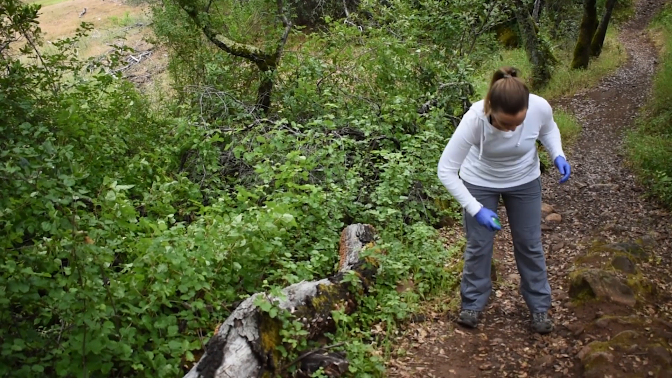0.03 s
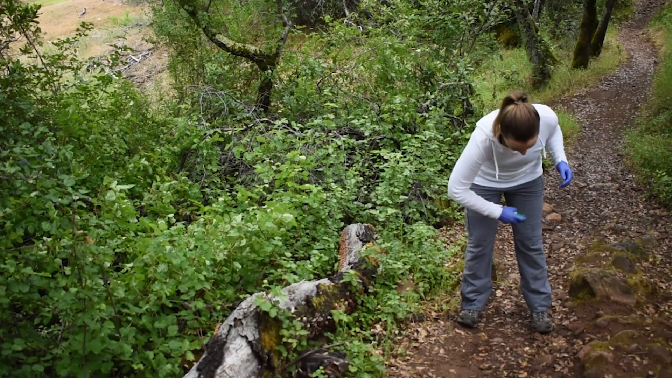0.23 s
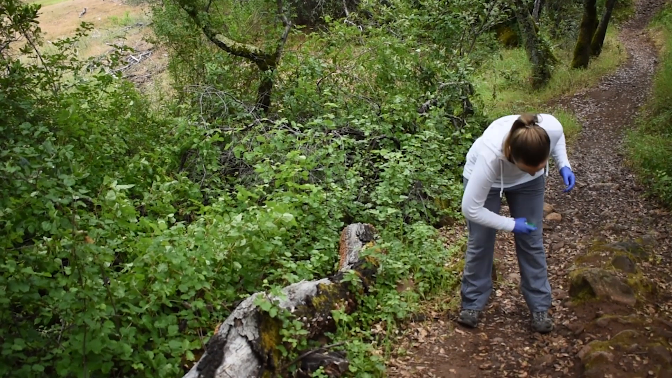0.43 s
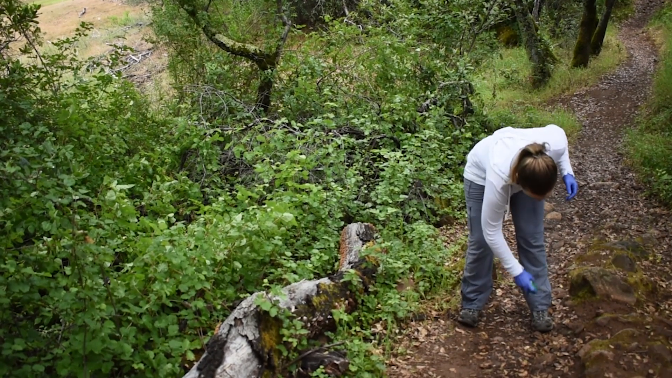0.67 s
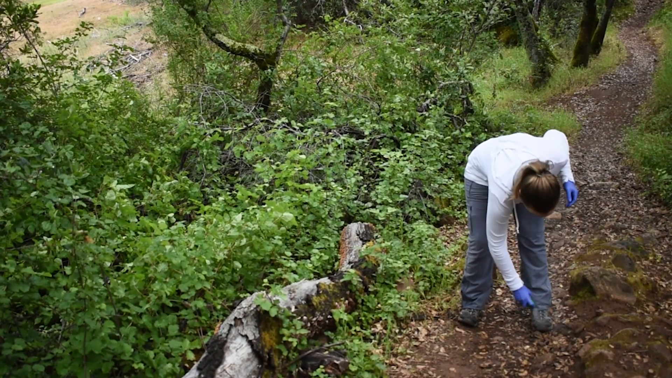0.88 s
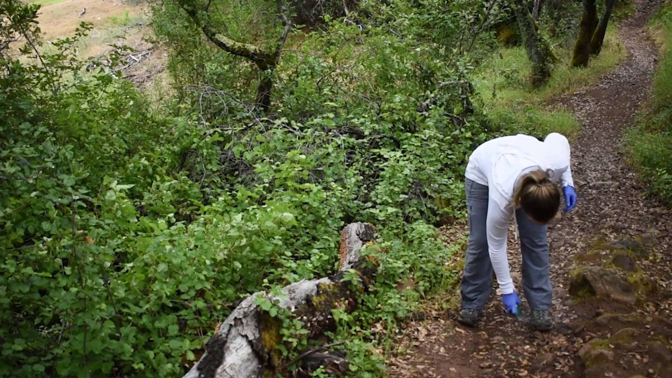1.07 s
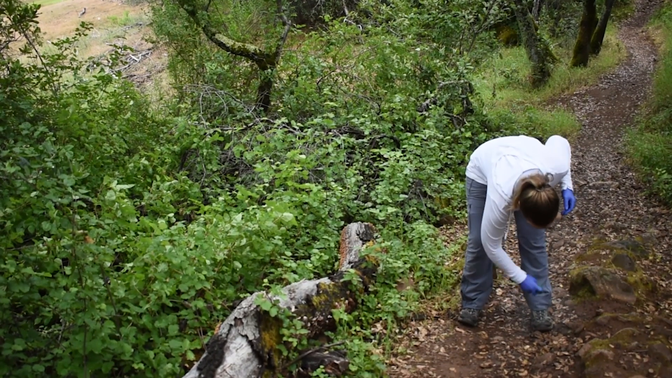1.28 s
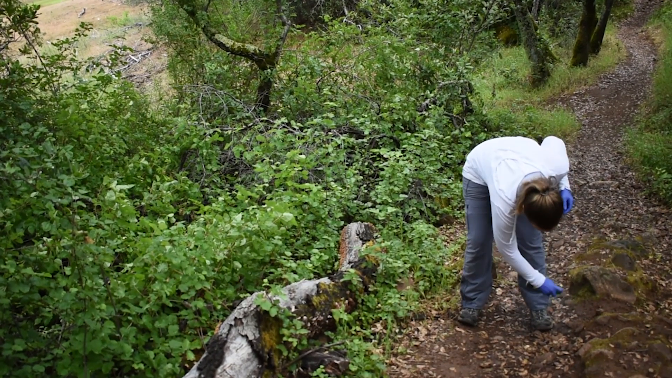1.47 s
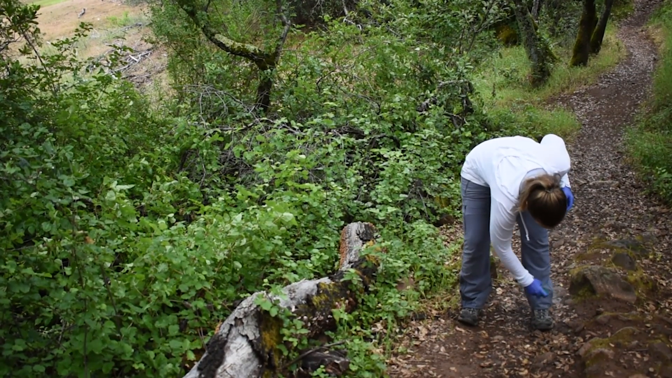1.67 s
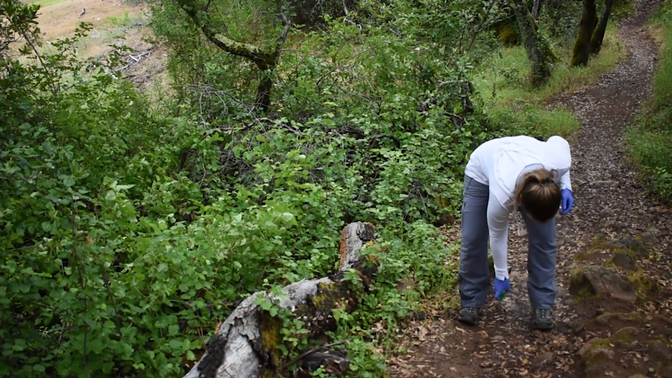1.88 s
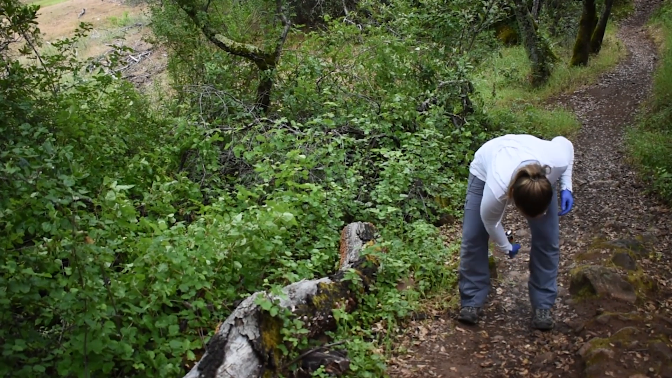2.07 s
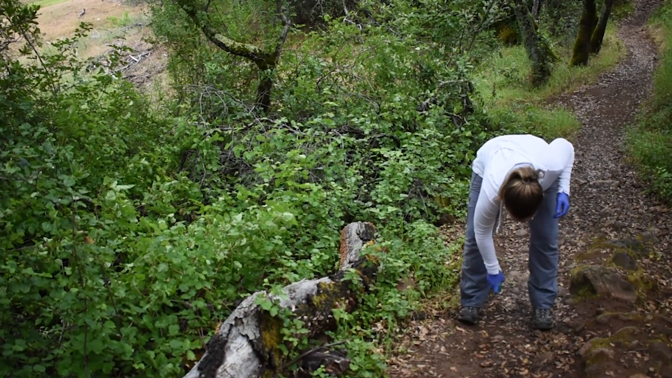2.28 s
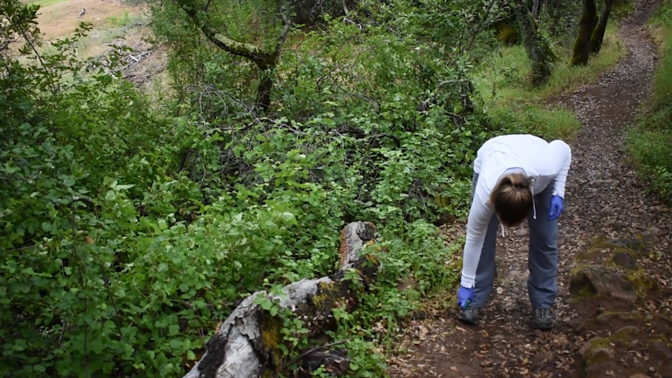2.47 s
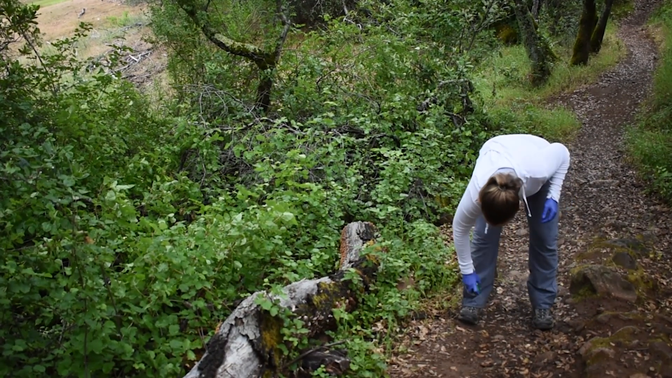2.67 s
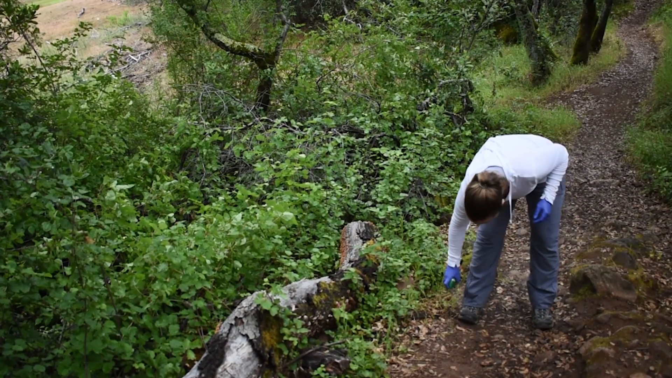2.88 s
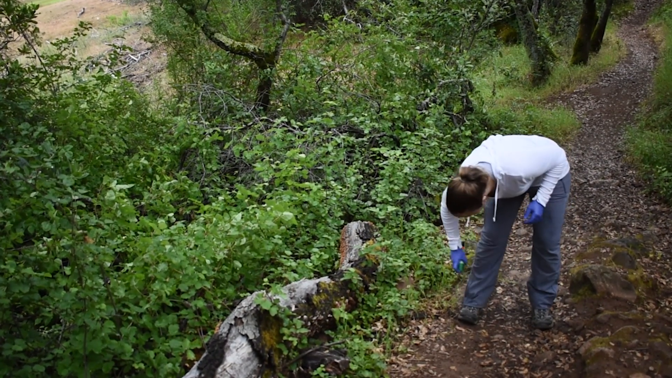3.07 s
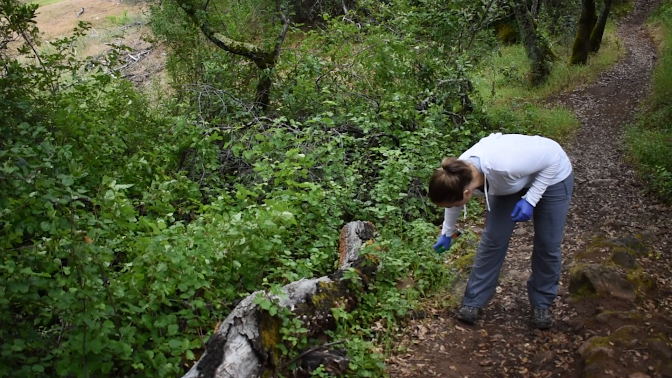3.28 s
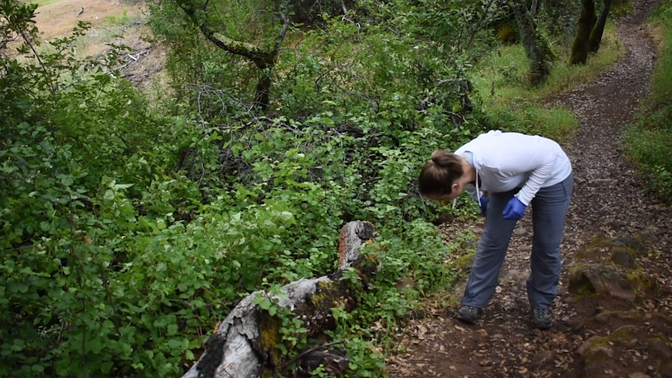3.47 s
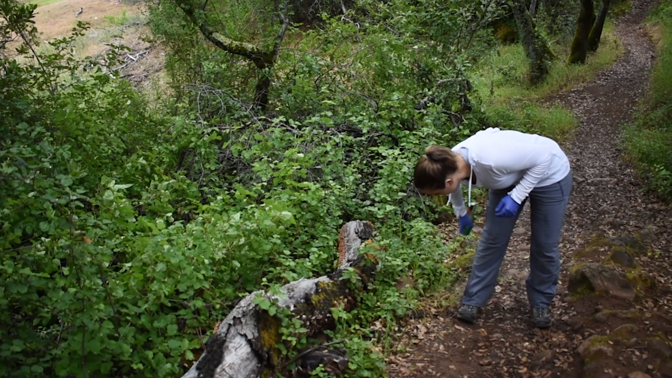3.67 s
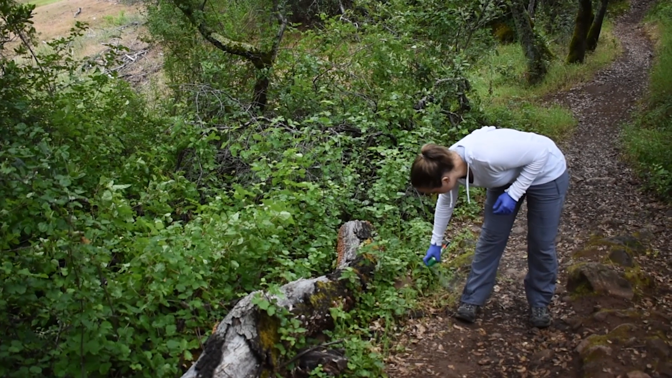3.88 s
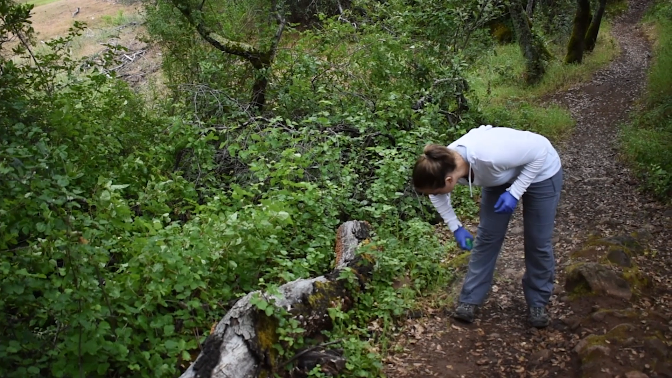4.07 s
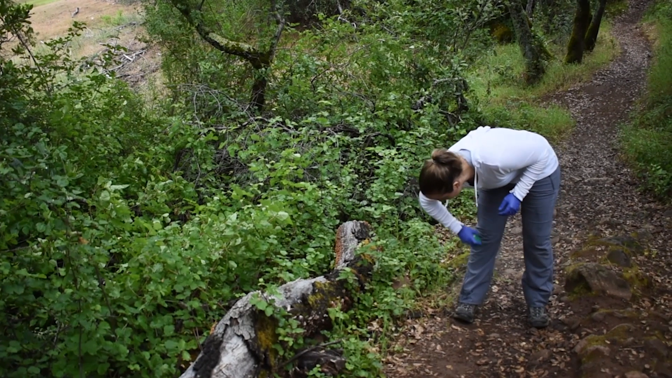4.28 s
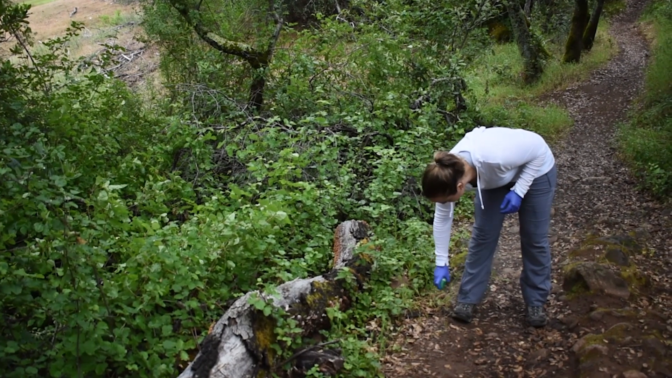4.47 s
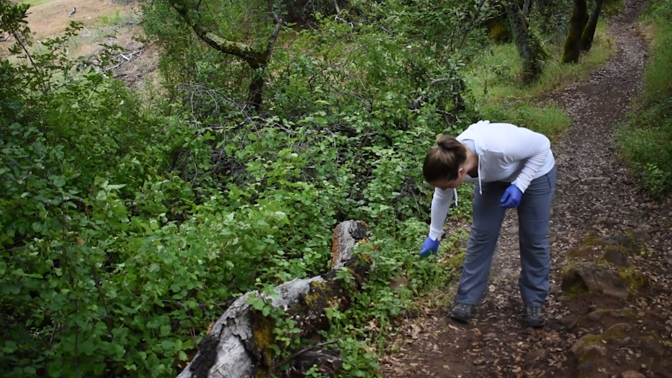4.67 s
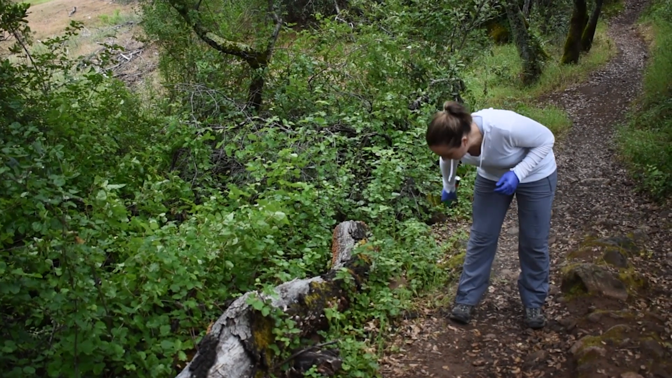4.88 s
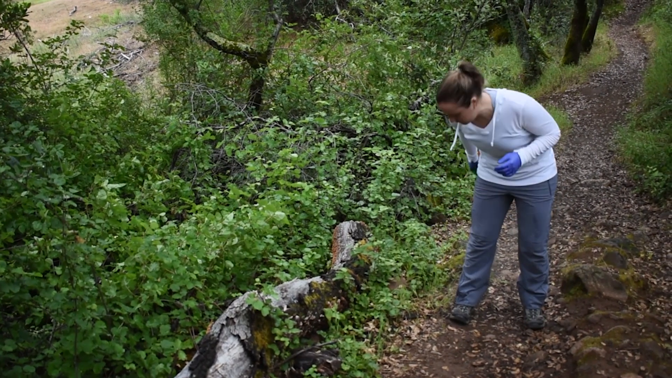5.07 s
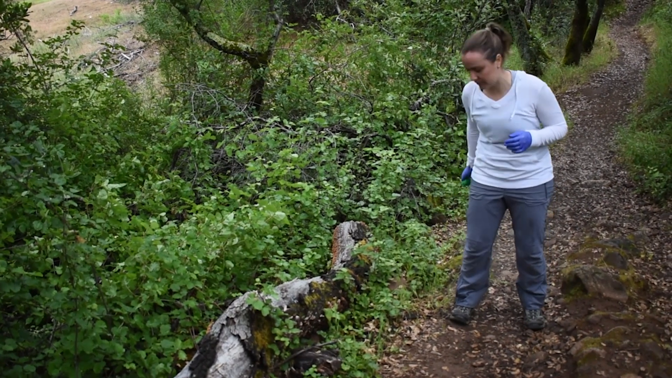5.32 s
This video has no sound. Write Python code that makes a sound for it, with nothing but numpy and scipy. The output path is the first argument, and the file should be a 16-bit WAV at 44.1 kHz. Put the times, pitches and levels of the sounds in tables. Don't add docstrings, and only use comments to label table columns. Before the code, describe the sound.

A quiet wooded trail, with soft far wind and a faint low drone. Small plastic cap ticks click close by at about 0.1 s, among faint bird chips and a short, thin whistle near 0.4 s. From 0.46 to 2.33 s an aerosol sprays: a dense, bright, uneven hiss, fine mist splashing on cloth and leaves, and a hollow, breathy tone around 1300 Hz swelling and fading. A brief gap holds a soft knock and bird chips. The second spray runs from 2.6 to 4.74 s, with lighter mist and a wandering hiss, a low knock at 2.85 s. Chips grow clearer around 4 s, and a steady high whistle holds from 4.4 to 5.4 s. At 4.83 s a foot knocks and crushes dry leaves and grit, settling again at 5.1 s. A rapid high warble falls at 5.15 s and a last chip follows. The spray is near and dry; the birds are distant and lightly reverberant, in stereo.

```python
import sys
import numpy as np
from scipy import signal
from scipy.io import wavfile
from scipy.ndimage import uniform_filter1d, map_coordinates

SR = 44100
rng = np.random.default_rng(int(sys.argv[2]) if len(sys.argv) > 2 else 0)


def rack_gain(trim_db):
    fader = np.asarray(trim_db, float)
    return 10 ** (fader / 20)


def output_pcm(signal):
    pcm = np.clip(np.atleast_2d(signal).T, -1, 1) * 32767
    wavfile.write(sys.argv[1], SR, np.round(pcm).astype(np.int16))


N = 235802


def evened(x):
    return x / np.sqrt(np.mean(x ** 2) + 1e-20)


def read(points, hz):
    f, value = np.transpose(points)
    return np.interp(np.log(hz + 1), np.log(f + 1), value)


def add(mix, s, sound):
    part = mix[..., round(s * SR):][..., :sound.shape[-1]]
    part += sound[..., :part.shape[-1]]


def panned(x, db):
    return x * rack_gain(np.array([[db / 2], [-db / 2]]))


def drift(count, span):
    size = max(int(span), 1)
    smooth = uniform_filter1d(rng.standard_normal(count), size)
    return evened(uniform_filter1d(smooth, size))


def noise(shape_db, patchy_db, frames):
    a, b, patches = rng.standard_normal((frames, 257, 3)).T
    patches = evened(uniform_filter1d(uniform_filter1d(patches, 7, 0), 28, 1))
    gain = rack_gain(shape_db(np.fft.rfftfreq(512, 1 / SR)[:, None]))
    gain = gain / np.sqrt((gain ** 2).mean(0))
    spectra = (a + 1j * b) * gain * rack_gain(patchy_db * patches)
    return evened(signal.istft(spectra, nperseg=512, noverlap=384)[1])


def resonate(x, hz, width_hz):
    turn = np.exp(2j * np.pi * np.cumsum(hz) / SR)
    r = np.exp(-np.pi * width_hz / SR)
    return 2 * (turn * signal.lfilter([1 - r], [1, -r], x / turn)).real


def sung(s, hz, db):
    tone = np.sin(2 * np.pi * np.cumsum(hz) / SR)
    return np.sqrt(2) * rack_gain(db) * tone * signal.windows.tukey(len(s), .08)


def traced(rows):
    s, *columns = np.transpose(rows)
    t = np.arange(s[0], s[-1], 1 / SR)
    return [t] + [np.interp(t, s, c) for c in columns]


def bumps(t, rows, shape):
    return np.abs((t - rows[:, :1]) / rows[:, 1:2]) ** shape


def frame_times(t):
    return t[np.minimum(np.arange(len(t) // 128 + 5) * 128, len(t) - 1)]


# frequency_hz, density_db
WIND_SPECTRUM = [(15, -17), (25, -9), (140, -5), (805, -7), (1960, -18.5), (3640, -16.5), (5590, -24),
                 (15600, -29)]
# frequency_hz, likeness_0_to_1
WIND_COHERENCE = [(60, 0.35), (300, 0.75), (700, 0.81), (1500, 0.77), (5000, 0.64), (15000, 0.25)]


def woods():
    frames, hz = N // 512 + 5, np.fft.rfftfreq(2048, 1 / SR)
    a, b, c, d = rng.standard_normal((frames, 1025, 4)).T
    same = np.clip(read(WIND_COHERENCE, hz), 0, 1)[:, None]
    swell_db = .9 * drift(frames, 14)
    mid, side = np.sqrt(1 + same) * (a + 1j * b), np.sqrt(1 - same) * (c + 1j * d)
    spectra = np.array([mid + side, mid - side]) * rack_gain(read(WIND_SPECTRUM, hz)[:, None] + swell_db)
    air = evened(signal.istft(spectra, nperseg=2048, noverlap=1536)[1][:, :N])
    drone = evened(resonate(rng.standard_normal(N), np.full(N, 70), 7))
    return rack_gain(-64) * air + rack_gain(-76) * drone


# frequency_hz, t60_s
TREE_DECAY = [(300, 0.15), (1500, 0.053), (4000, 0.52), (9000, 0.09), (15000, 0.023)]


def trees(x):
    taps = np.zeros((2, SR))
    at = np.arange(60, SR - 20, 20) + rng.integers(0, 20, (2, (SR - 61) // 20))
    np.put_along_axis(taps, at, rng.choice([-1., 1.], at.shape), 1)
    hz, t, z = signal.stft(taps, SR, nperseg=256)
    decay = rack_gain(-60 * t / read(TREE_DECAY, hz)[:, None])
    tail = signal.istft(z * decay, SR, nperseg=256)[1]
    return signal.fftconvolve(x[None], tail / np.linalg.norm(tail[0]), axes=1)[:, :N]


# time_s, pitch_hz, level_db
CHIP_SHAPE = [(0, 5500, -9), (.012, 2900, -2), (.015, 3600, -9), (.019, 4650, -4), (.026, 4420, 0),
              (.043, 3700, -2), (.050, 2400, -14), (.058, 1700, -24)]
# start_s, level_db, perch_index
CHIP_CALLS = [(.030, -71, 1), (.278, -70, 0), (1.24, -68, 1), (1.54, -68, 1), (1.82, -68, 1),
              (2.118, -62, 1), (2.262, -66, 1), (2.342, -63, 1), (2.568, -62, 1), (3.172, -65, 1),
              (3.943, -59.5, 1), (4.163, -59.5, 1), (4.375, -59.5, 1), (4.652, -59.5, 1), (5.196, -57.5, 0)]
# left_right_db, scatter_db, right_delay_samples
PERCHES = [
    (2, -4, 1),
    (3, 3, 4),
]


def chips():
    direct, scattered = np.zeros((2, N)), np.zeros(N)
    t, hz, shape_db = traced(CHIP_SHAPE)
    pitches = 1 + 0.0107 * rng.standard_normal(len(CHIP_CALLS))
    for (s, db, perch), pitch in zip(CHIP_CALLS, pitches):
        pan_db, scatter_db, late = PERCHES[perch]
        call = rack_gain(db) * sung(t, pitch * uniform_filter1d(hz, 60), shape_db)
        left, right = panned(call, pan_db)
        add(direct[0], s, left)
        add(direct[1], s + late / SR, right)
        add(scattered, s, rack_gain(scatter_db) * call)
    return direct, scattered


# top_hz, trough_hz, level_db
WARBLE_SWINGS = [(9700, 7900, -65), (9050, 7350, -64), (8900, 7150, -66.5), (8550, 7200, -68.5),
                 (7750, 7250, -74)]


def warble():
    out, t = np.zeros((2, N)), np.arange(5.141, 5.272, 1 / SR)
    swings = 36.8 * (t - 5.1515)
    top_hz, low_hz, db = (np.interp(swings, range(len(WARBLE_SWINGS)), c) for c in np.transpose(WARBLE_SWINGS))
    height = (np.cos(2 * np.pi * swings) - .12 * np.cos(4 * np.pi * swings) + 1.12) / 2
    db = db + 25 * np.minimum(swings, 0)
    add(out, t[0], panned(sung(t, low_hz + (top_hz - low_hz) * height, db), -1.6))
    return out


def arched_whistle():
    out, length_s = np.zeros((2, N)), .058
    off = np.linspace(-1, 1, round(length_s * SR)) ** 2
    add(out, .378, panned(sung(off, 6700 - 720 * off, -74.5 - 7 * off), -3))
    return out


# start_s, length_s, pitch_hz, level_db, left_right_db
HELD_WHISTLES = [
    (0, .04, 3345, -71.5, 2),
    (4.42, .99, 3432, -66.5, 5),
    (4.6, .6, 2921, -76.5, 3),
]


def held_whistles():
    out = np.zeros((2, N))
    for s, length, hz, db, pan_db in HELD_WHISTLES:
        t = np.arange(0, length, 1 / SR)
        hz = hz - 55 * np.maximum(t - .42, 0) + 4 * drift(len(t), 900)
        db = db - 8 * np.maximum(1 - t / length / .3, 0) + .9 * drift(len(t), 300)
        add(out, s, panned(sung(t, hz, db), pan_db))
    return out


# start_s, level_db
TREADS = [
    (4.828, -60),
    (4.857, -55.5),
    (5.09, -57.5),
]
# frequency_hz, density_db
LITTER_SPECTRUM = [(120, -38), (250, -10.5), (550, -4.5), (1100, -13), (2300, -23.5), (3000, -19),
                   (5000, -32), (15000, -36)]


def shuffle():
    t = np.arange(4.81, 5.345, 1 / SR)
    s, peak_db = np.transpose(TREADS)[..., None]
    rise_db_per_s, fall_db_per_s = 500, 18
    db = (peak_db + np.minimum(rise_db_per_s * (t - s), fall_db_per_s * (s - t))).max(0)
    crush = noise(lambda hz: read(LITTER_SPECTRUM, hz), 1.4, len(t) // 128 + 5)[:len(t)]
    return t[0], rack_gain(db - 3.0) * evened(crush * rack_gain(1.6 * drift(len(t), 120)))


# start_s, peak_db, body_hz, edge_relative_db, edge_hz
CAP_TICKS = [(.0733, -45, 910, 1, 5000), (.0734, -52, 2500, -1, 3300), (.0975, -63, 6000, 4, 5500),
             (.1016, -45, 2400, 6, 4600), (.1022, -48, 950, -5, 10500), (.1300, -49, 2800, 11, 3900),
             (.1301, -57, 10300, 6, 8000), (2.446, -57, 160, -8, 3000), (2.8547, -44, 450, 5, 850),
             (4.8265, -46, 780, -6, 1200), (4.8502, -42, 270, 2, 900)]


def ticks():
    out, t = np.zeros(N), np.arange(4000) / SR
    rise = 1 - np.exp(-t / .00015)
    for s, db, hz, edge_db, edge_hz in CAP_TICKS:
        decay_db = -60 * t / .011 * np.sqrt(hz / 1000)
        body = rack_gain(decay_db) * np.sin(2 * np.pi * hz * t)
        edge = rack_gain(edge_db - 60 * t * edge_hz / 12) * np.sin(2 * np.pi * edge_hz * t)
        sign = 1 if hz < 500 else -1
        add(out, s, sign * rack_gain(db) * (1.3 * body + edge) * rise)
    return out


# time_s, splash_db, brightness_db_per_octave, fineness_db
MIST = [
    [(.49, -49, 3, -10), (.72, -49, 0.5, -7), (1.0, -49.5, 2.5, -12), (1.17, -56, -5.5, 0),
     (1.47, -51.5, 5.5, -14), (1.63, -56.5, 12, -19), (1.72, -51.5, -3, -2), (2.02, -52.5, 3.5, -7),
     (2.25, -50.5, 0, -2.5)],
    [(2.62, -54, 3.5, -8), (2.74, -55.5, -0.5, 0), (3.0, -59, -5.5, 0), (3.3, -65.5, 4, 1),
     (3.5, -57, -4, 4), (3.72, -58.5, 6, -4), (3.95, -56.5, -2, 1), (4.42, -53, 5.5, -9),
     (4.75, -60, -4.5, -3)],
]
# frequency_hz, level_db
SPLASH_SPECTRUM = [(200, -18.5), (600, -4.5), (1150, 5), (1800, -3), (2800, -6), (4200, -2.5), (5500, -2.5),
                   (7000, -17)]
# frequency_hz, level_db
FIZZ_SPECTRUM = [(10500, -16), (12000, 4), (13000, -1), (14000, -5), (15700, -14)]


def mist_splash(which, t, slug_db):
    mist_s, splash_db, tilt_db, fine_db = np.transpose(MIST[which])
    at_s, n = frame_times(t), len(t)
    tilt_db = np.interp(at_s, mist_s, tilt_db)

    def splash_shape(hz):
        return read(SPLASH_SPECTRUM, hz) + tilt_db * np.log2(np.clip(hz, 2200, 6000) / 3300)

    splash = noise(splash_shape, 1.45, len(at_s))[:n]
    fizz = noise(lambda hz: read(FIZZ_SPECTRUM, hz), 1.9, len(at_s))[:n]
    splash_db, fine_db = np.interp(t, mist_s, splash_db), np.interp(t, mist_s, fine_db)
    return rack_gain(splash_db + 3.5 + 0.53 * slug_db) * splash + rack_gain(splash_db + fine_db) * fizz


OPEN_DB = -39
# middle_s, half_length_s, level_db, pitch_hz
CAP_SWELLS = [(0.545, 0.055, -44.5, 1306), (0.77, .09, -42.5, 1307), (.92, 0.045, -38.5, 1355),
              (1.079, 0.079, -39.5, 1355), (1.292, 0.036, -44.5, 1274), (1.48, 0.068, -44.5, 1290),
              (1.6, 0.078, -52.5, 1235), (1.83, .1, -44, 1330), (2.02, 0.037, -50.5, 1356),
              (2.183, 0.055, -43, 1278), (2.29, 0.045, -47.5, 1345), (2.701, 0.081, -38, 1284),
              (2.884, 0.042, -52.5, 1480), (3.15, 0.13, -56, 1297), (3.48, 0.29, -49, 1292),
              (3.698, 0.19, -49, 1260), (3.847, 0.031, -55, 1290), (4.056, .11, -41, 1292),
              (4.238, 0.047, -42, 1272), (4.385, 0.087, -47.5, 1305), (4.636, .1, -44, 1316)]


def cap_ring(t):
    at_s, n, width_hz = frame_times(t), len(t), 98
    swells = np.array(CAP_SWELLS)
    edge_db = np.maximum(-5.5 * bumps(at_s, swells, 1.74), -80)
    power = rack_gain(swells[:, 2:3] + edge_db) ** 2
    ring_hz = np.interp(t, at_s, swells[:, 3] @ power / power.sum(0))
    ring_db = np.interp(t, at_s, 10 * np.log10(power.sum(0) + rack_gain(-72) ** 2))
    ring_db += OPEN_DB * np.clip(1 - (t - t[0]) / 0.051, 0, 1) ** 2
    ring_hz = ring_hz + 25 * drift(n, 1770)
    blown = resonate(rng.standard_normal(n), ring_hz, width_hz)
    ring = evened(resonate(blown, ring_hz, 4.5 * width_hz))
    return ring * rack_gain(ring_db + 1.04 * drift(n, 400))


# frequency_hz, width_hz, depth_0_to_1
HISS_NOTCHES = [
    (5700, 200, 0.55),
    (8750, 240, 0.6),
]


def notched(x):
    for hz, width_hz, depth in HISS_NOTCHES:
        x = x - np.clip(depth, 0, 1) * resonate(x, np.full(len(x), hz), width_hz)
    return x


# delay_s, level_db
BOUNCES = [(.00055, -7), (.001, -9), (.0016, -8.5), (.0026, -9)]


def bounced(x):
    at, out = np.arange(len(x)), x.copy()
    for s, db in BOUNCES:
        late = s * SR * np.exp(0.2268 * drift(len(x), 8740))
        out += rack_gain(db) * map_coordinates(x, [at - late], order=3)
    return out / np.sqrt(1 + (rack_gain(np.array(BOUNCES)[:, 1]) ** 2).sum())


# middle_s, width_s, level_db
FLOW_SLUGS = [(.52, 0.011, -2), (1.31, 0.022, 1.5), (1.95, .012, -5), (1.999, 0.0093, -6.5),
              (2.19, 0.047, 2), (2.617, .008, 3.5), (2.9, 0.023, 2), (3.99, 0.0069, 6.5), (4.2, .03, 1),
              (4.4, .03, 0.5), (4.68, 0.067, 2.5)]


def slug_level(t):
    at_s, slugs = frame_times(t), np.array(FLOW_SLUGS)
    return np.interp(t, at_s, slugs[:, 2] @ np.exp(-bumps(at_s, slugs, 3.6)))


# time_s, jet_db, centre_hz
AIM = [
    [(.49, -44, 8200), (.56, -37.5, 8500), (.97, -44, 9600), (1.13, -35, 9450), (1.36, -41.5, 10300),
     (1.655, -47.5, 7900), (1.71, -41.5, 8100), (1.86, -38, 9200), (2.33, -43.5, 8440)],
    [(2.62, -40, 10100), (2.86, -36, 9400), (2.95, -44.5, 8660), (3.45, -43.5, 8400), (3.74, -47.5, 8700),
     (4.19, -38.5, 8800), (4.45, -47, 9100), (4.55, -39, 9100), (4.75, -47, 9400)],
]
# frequency_hz, density_db
JET_SPECTRUM = [(4000, -40), (5000, -17), (5700, -9), (7900, 1.5), (9500, 7), (11500, -1.5), (12400, -6.5),
                (13500, -32.5)]


def jet_hiss(which, t, slug_db):
    aim_s, jet_db, jet_hz = np.transpose(AIM[which])
    at_s = frame_times(t)
    stretch = (np.interp(at_s, aim_s, jet_hz) / 9660) ** .5
    jet = noise(lambda hz: read(JET_SPECTRUM, hz / stretch), 1.9, len(at_s))[:len(t)]
    return rack_gain(np.interp(t, aim_s, jet_db) + slug_db) * jet


# open_s, close_s
VALVE = [
    (.462, 2.333),
    (2.6, 4.742),
]
# delay_s, level_db
VALVE_SHUT = [
    (.014, -17),
    (.075, -35),
]


def spray(which):
    opens, closes = VALVE[which]
    shut_s, shut_db = np.transpose(VALVE_SHUT)
    t = np.arange(opens, closes + shut_s[-1], 1 / SR)
    slug_db, ring = slug_level(t), cap_ring(t)
    hiss = notched(jet_hiss(which, t, slug_db) + mist_splash(which, t, slug_db))
    out = bounced(hiss + 0.36 * ring) + 0.62 * ring
    valve_s = [opens, opens + 0.028, closes, *(closes + shut_s)]
    valve_db = np.interp(t, valve_s, [OPEN_DB, 0, 0, *shut_db])
    sputter_db = 0.39 * drift(len(t), 590) + 0.74 * drift(len(t), 155)
    return opens, rack_gain(valve_db + sputter_db + 1.0) * out * signal.windows.tukey(len(t), .006)


def scene():
    background = woods()
    direct, scattered = chips()
    calls = warble() + arched_whistle() + held_whistles()
    near = ticks()
    add(near, *shuffle())
    for which in range(len(VALVE)):
        add(near, *spray(which))
    far = scattered + rack_gain(-16) * calls.mean(0) + rack_gain(-45.0) * near
    return near + calls + direct + trees(far) + background


def band_limit(x):
    return signal.sosfilt(signal.butter(12, 15710, fs=SR, output="sos"), x)


def record(dry):
    edge = signal.firwin(1201, 15780, window=("kaiser", 10), fs=SR)
    mix = signal.oaconvolve(dry, edge[None], "same")
    return band_limit(mix)


dry = scene()
out = record(dry)
output_pcm(out)
```